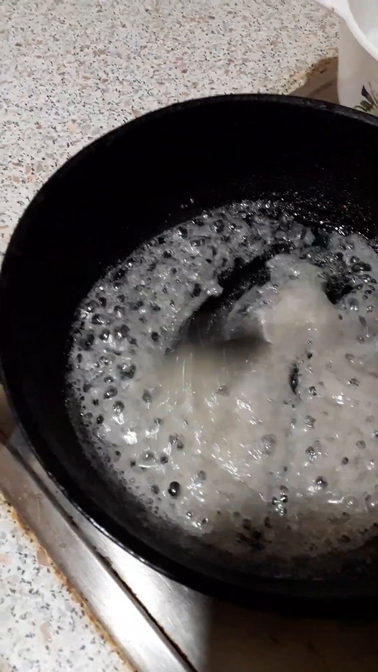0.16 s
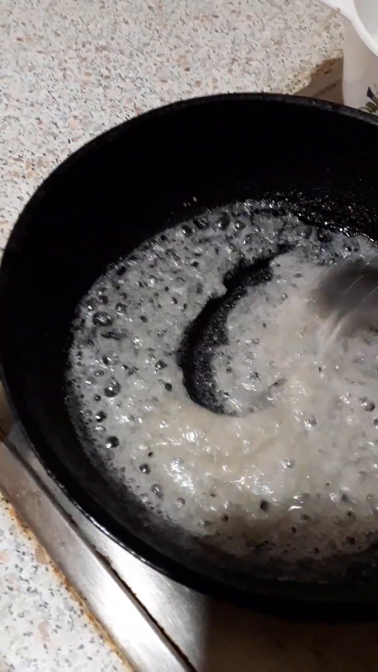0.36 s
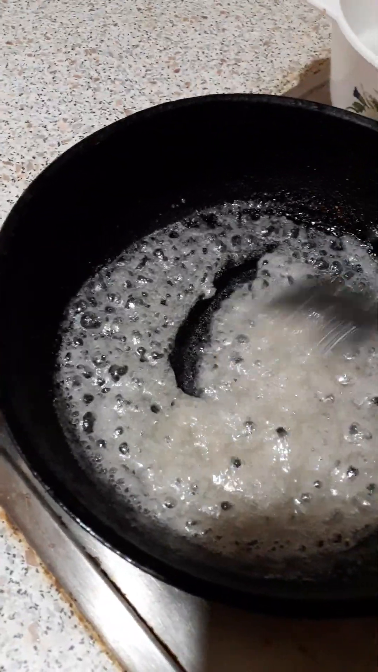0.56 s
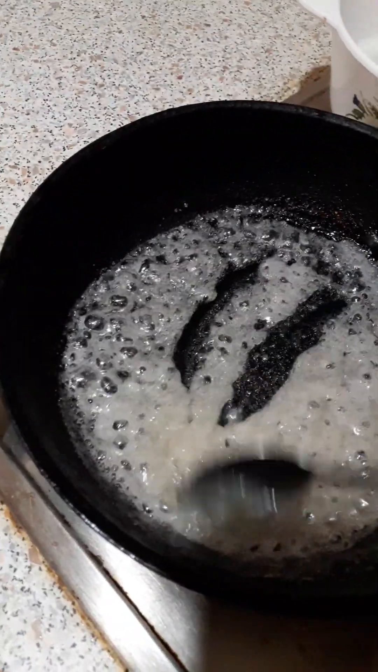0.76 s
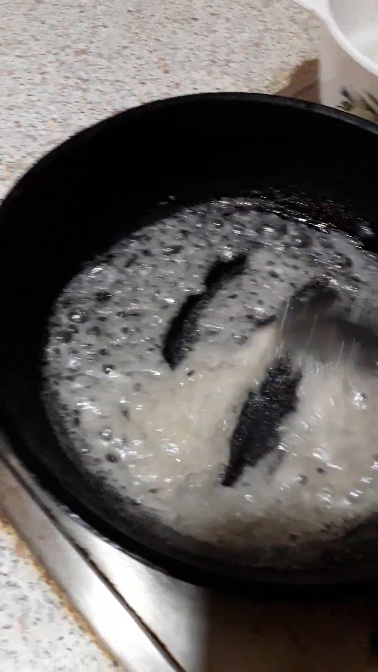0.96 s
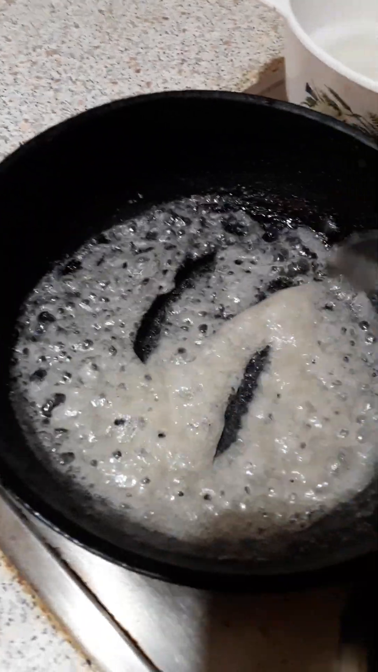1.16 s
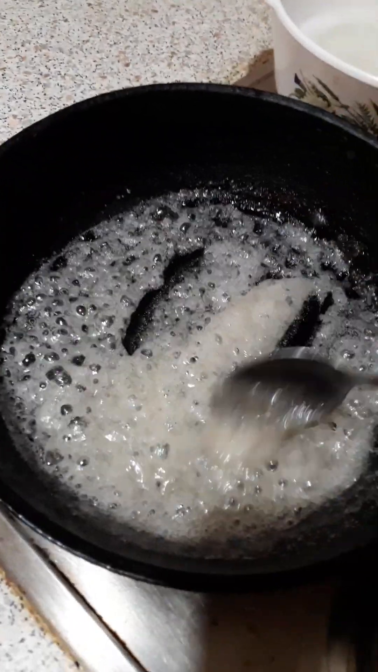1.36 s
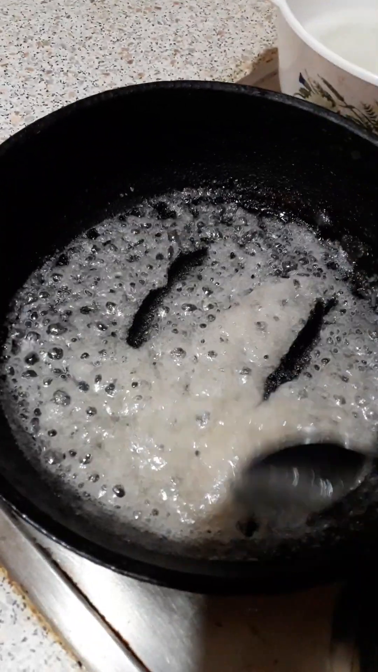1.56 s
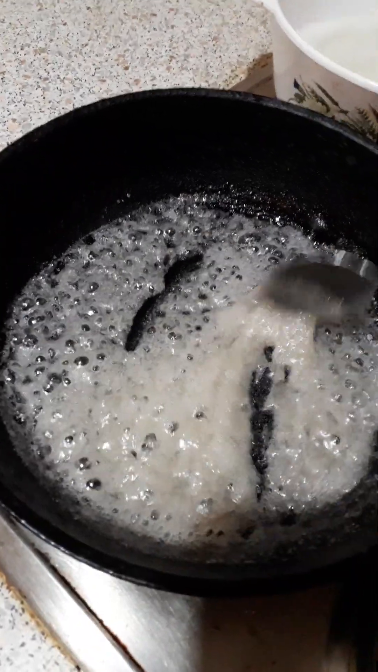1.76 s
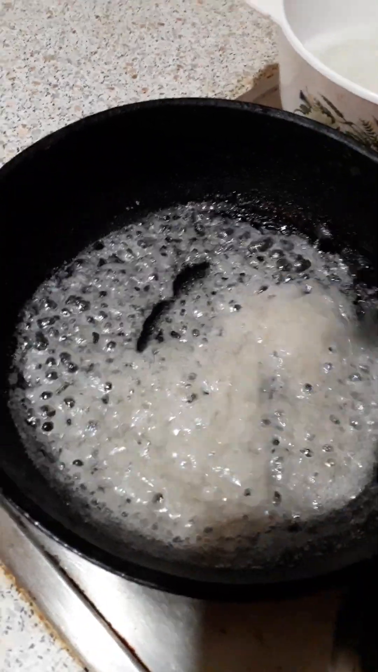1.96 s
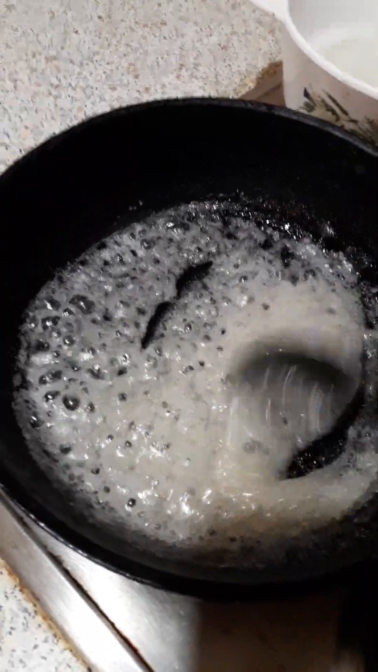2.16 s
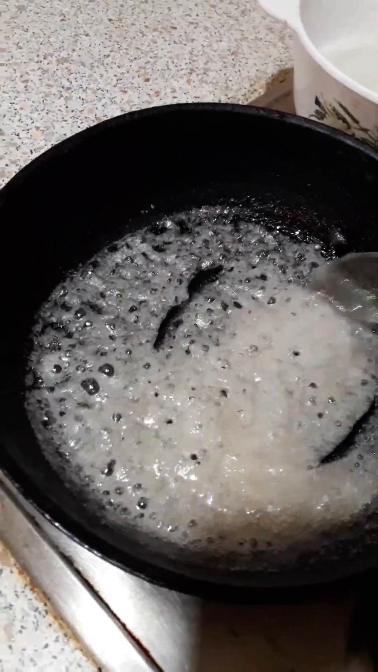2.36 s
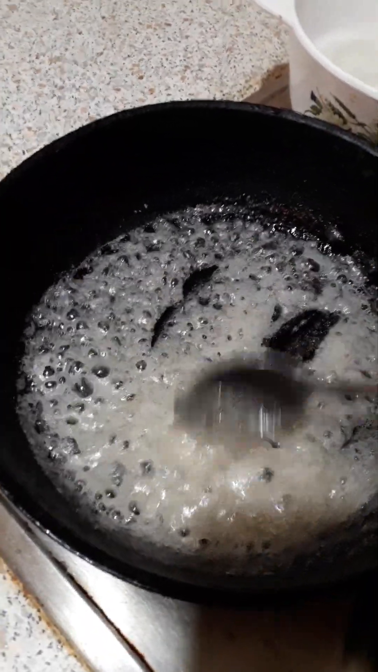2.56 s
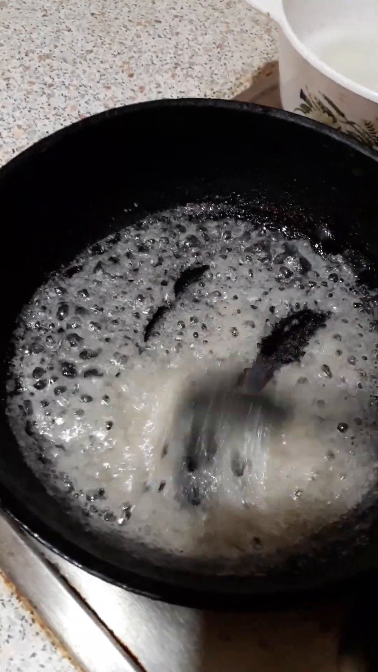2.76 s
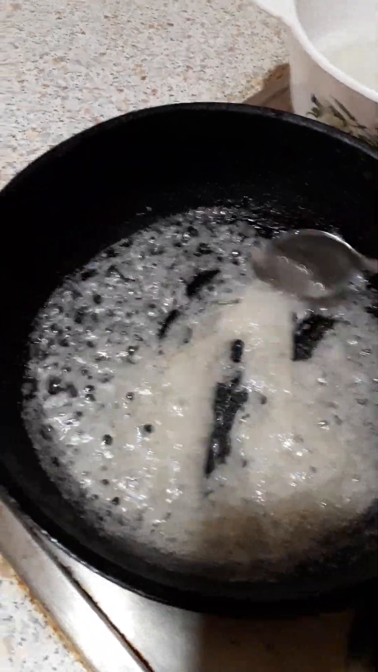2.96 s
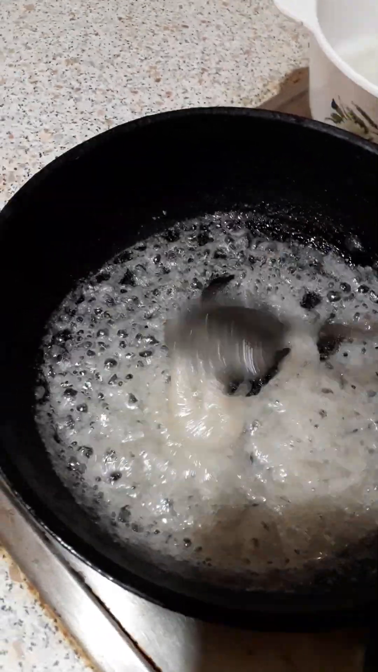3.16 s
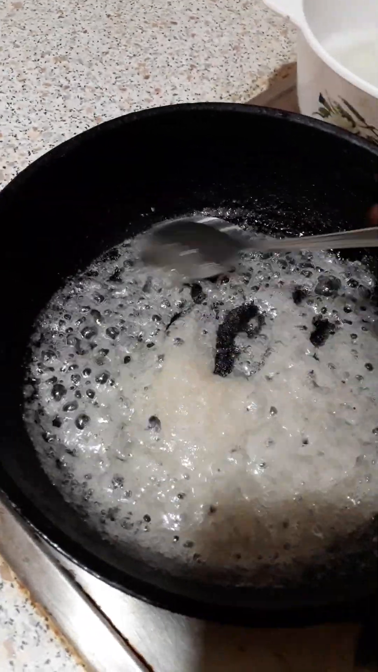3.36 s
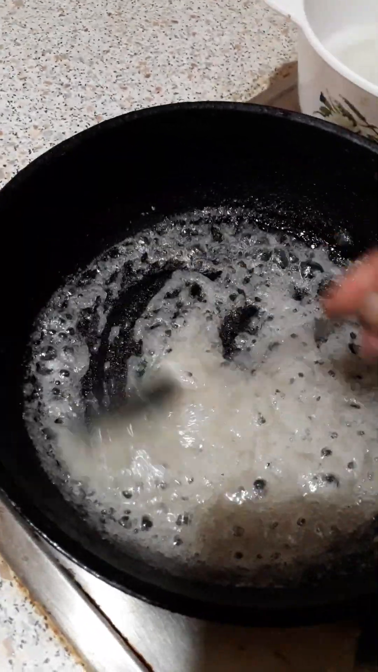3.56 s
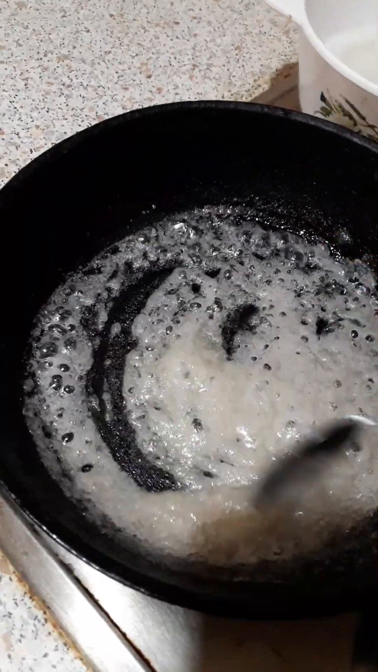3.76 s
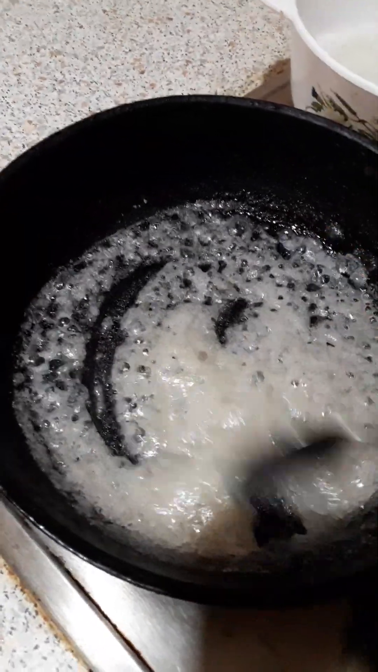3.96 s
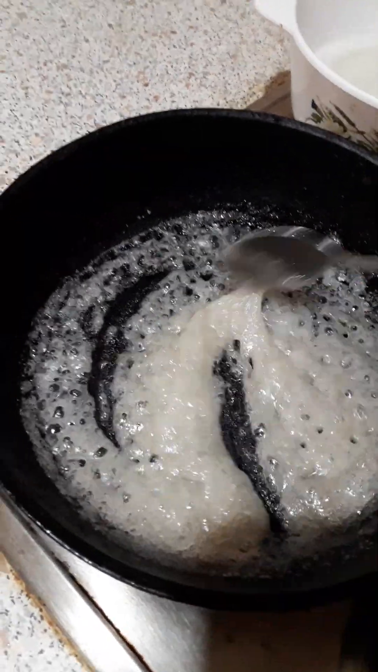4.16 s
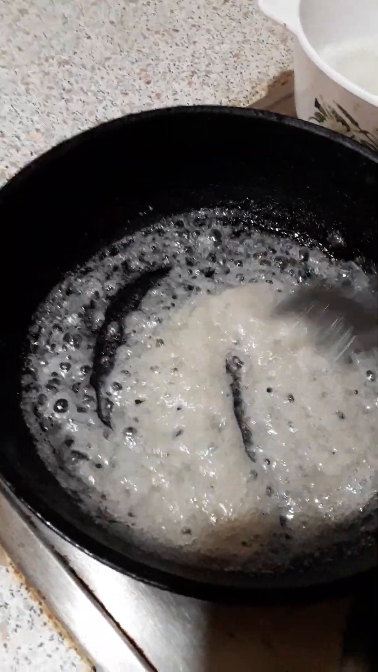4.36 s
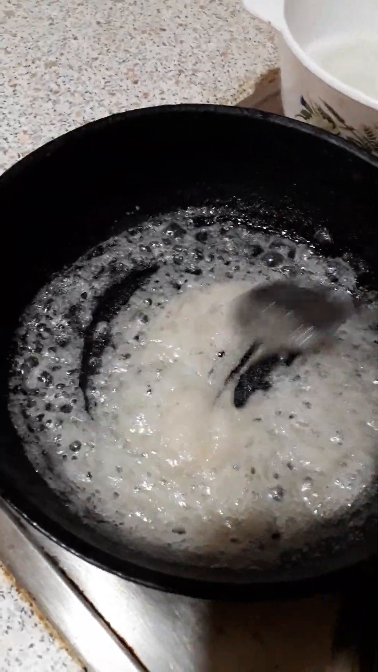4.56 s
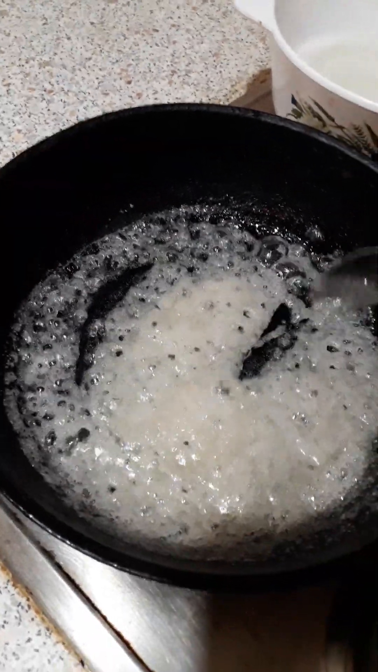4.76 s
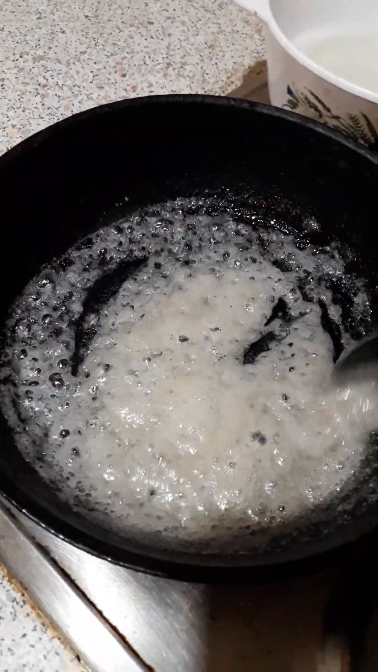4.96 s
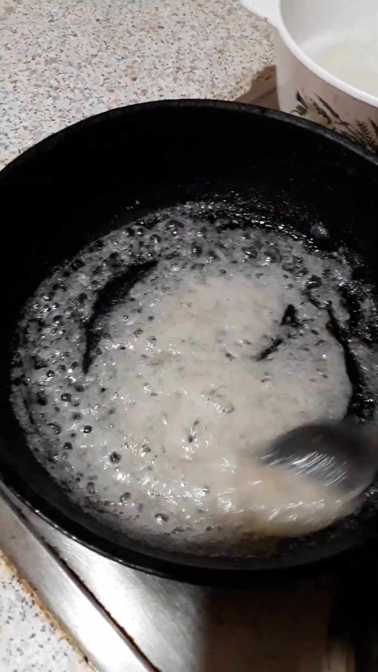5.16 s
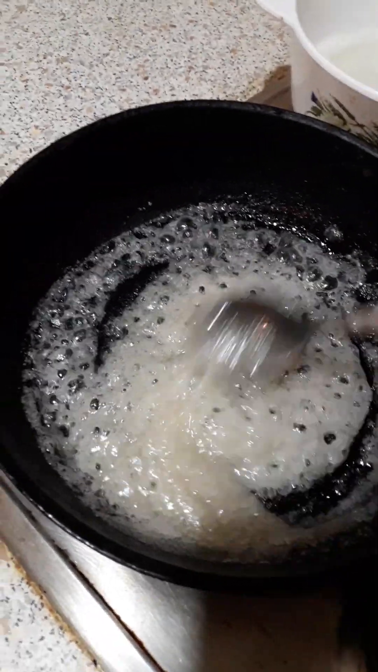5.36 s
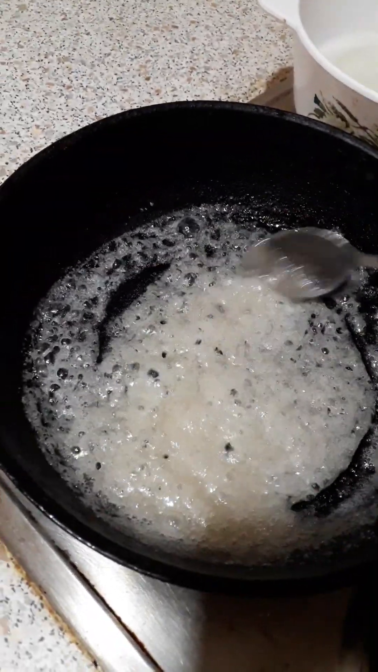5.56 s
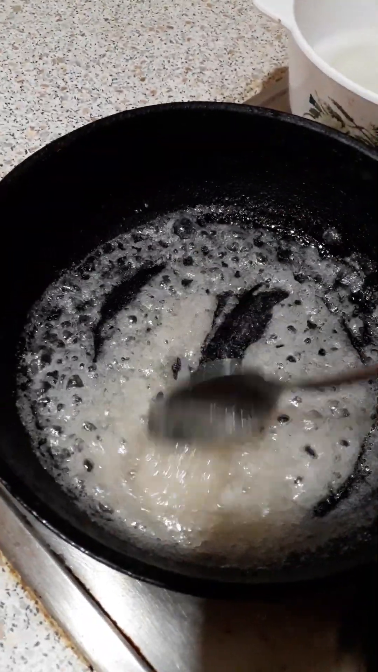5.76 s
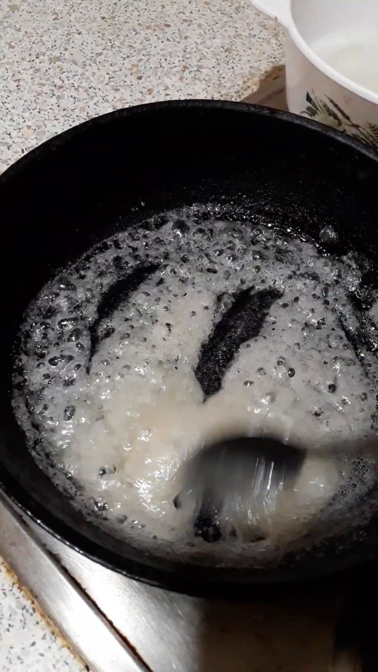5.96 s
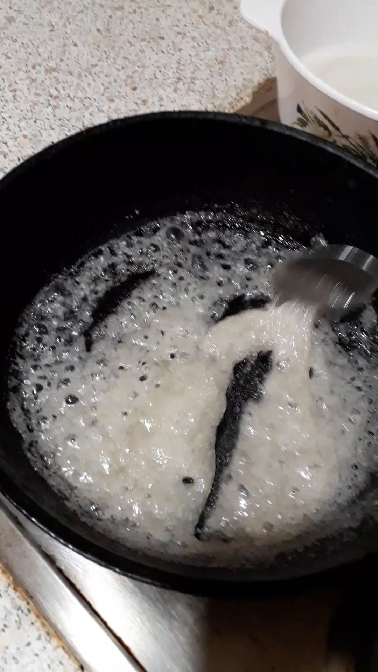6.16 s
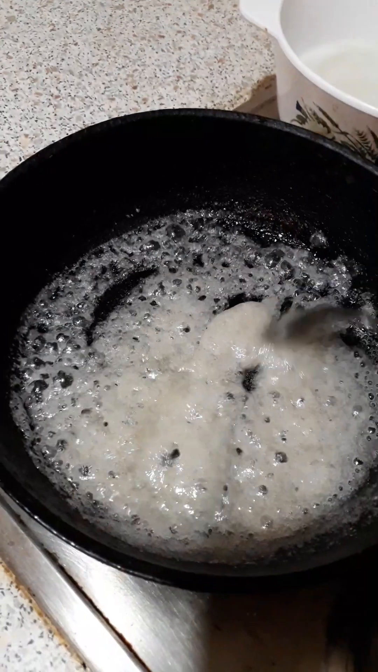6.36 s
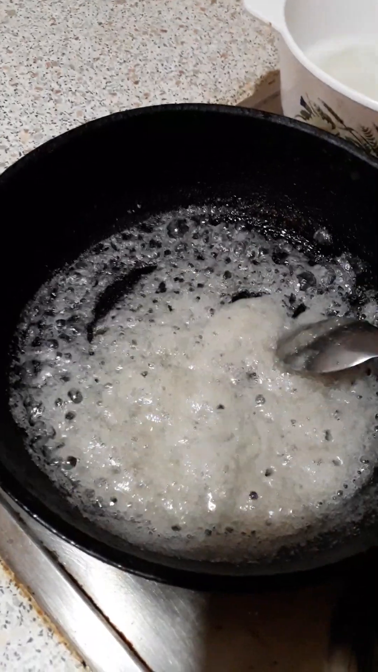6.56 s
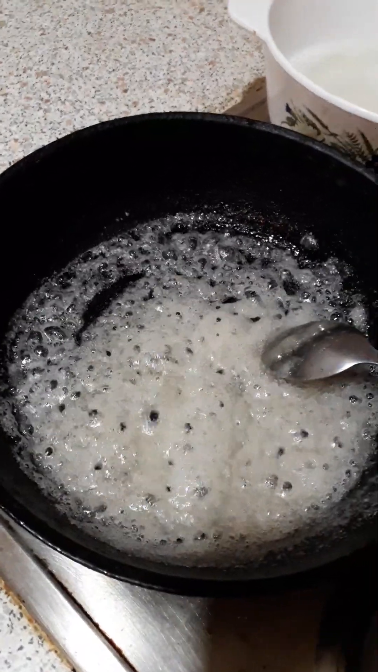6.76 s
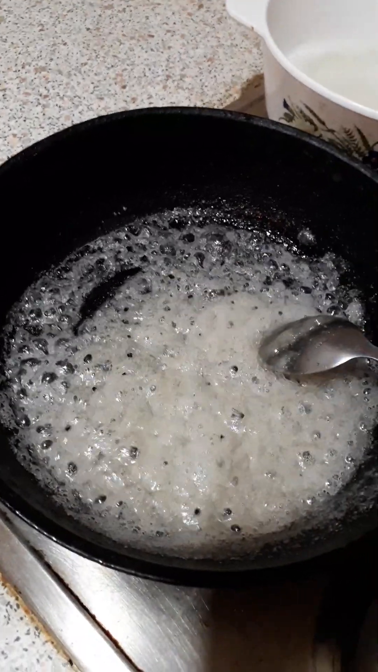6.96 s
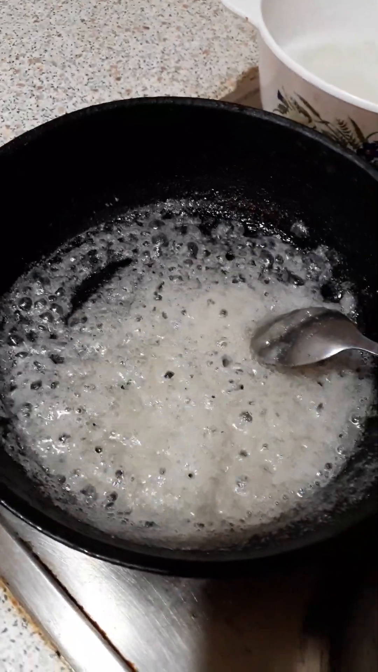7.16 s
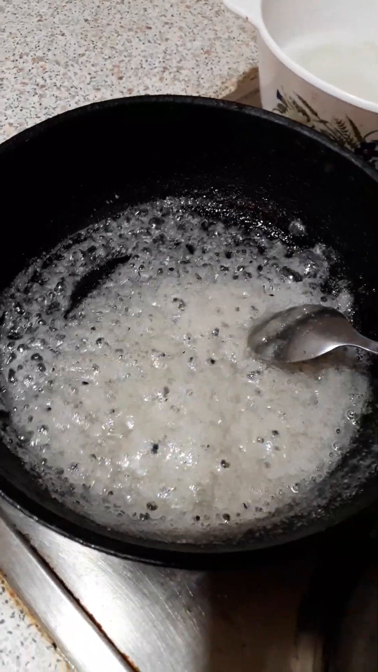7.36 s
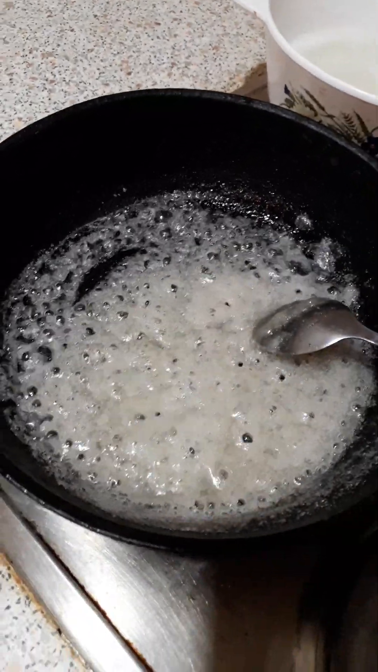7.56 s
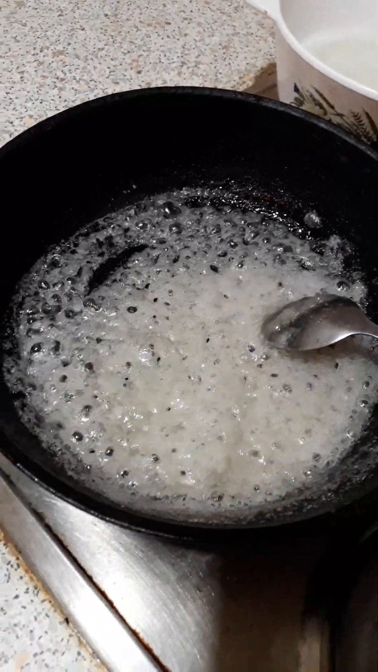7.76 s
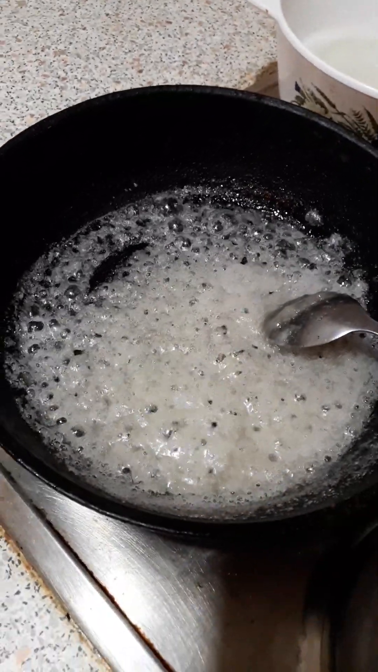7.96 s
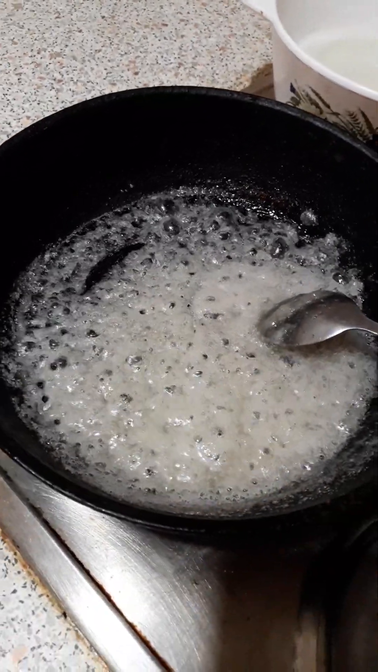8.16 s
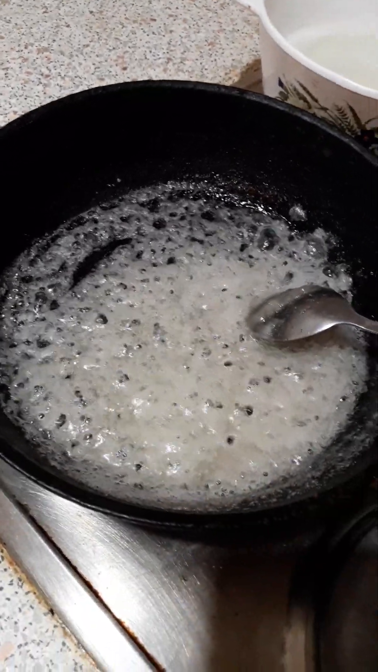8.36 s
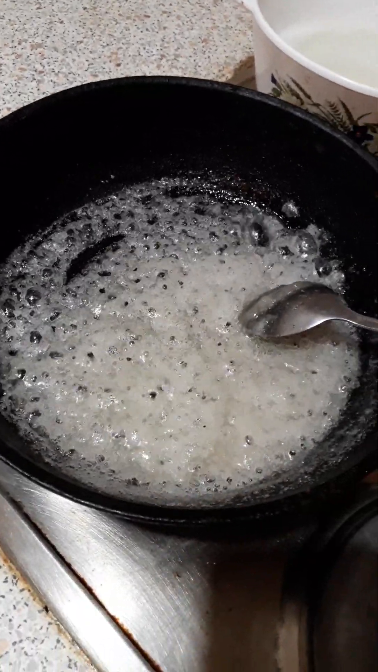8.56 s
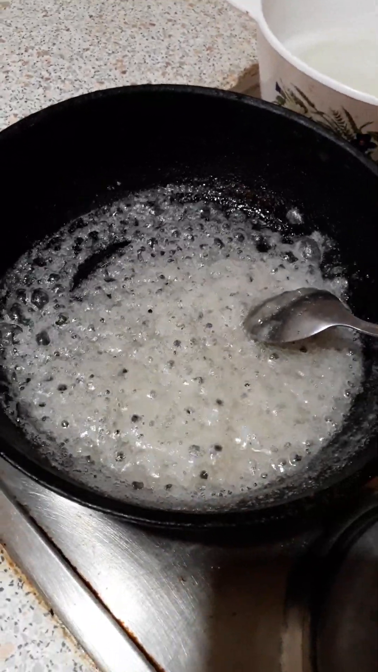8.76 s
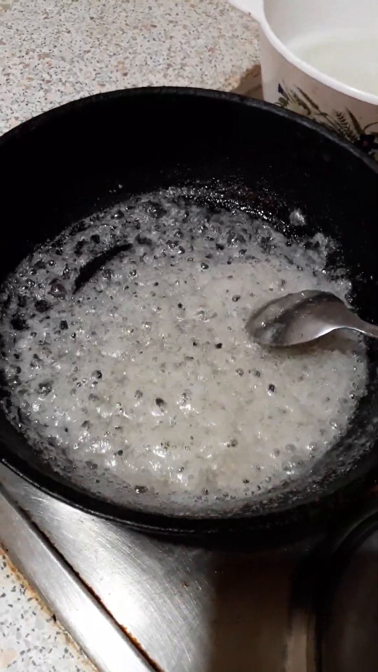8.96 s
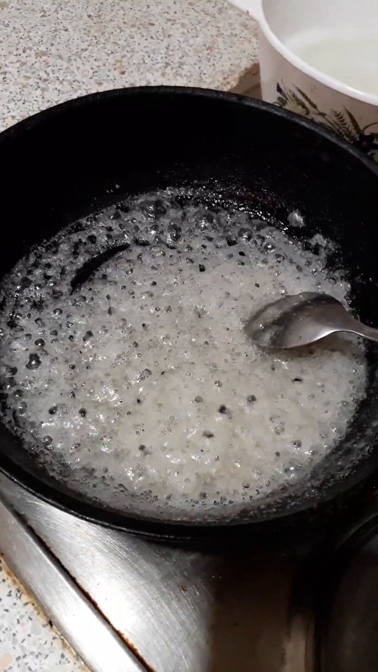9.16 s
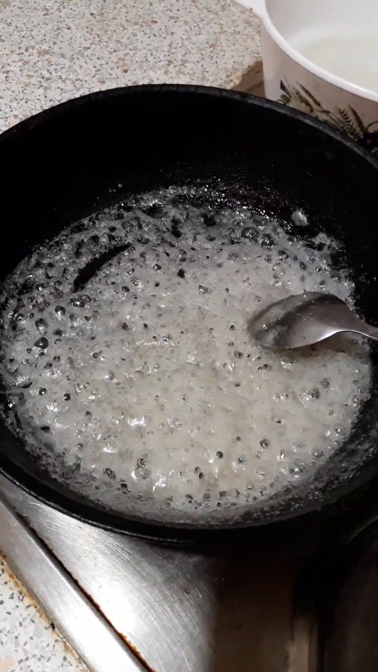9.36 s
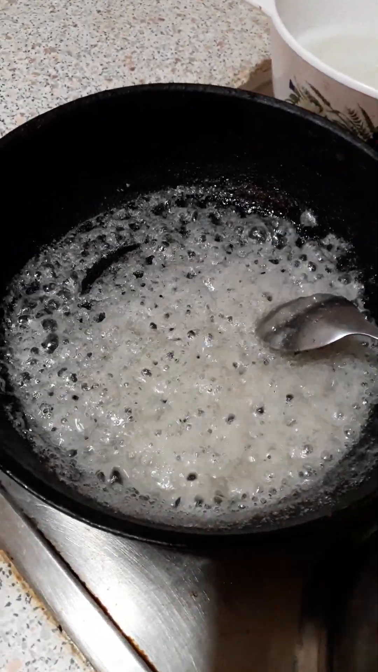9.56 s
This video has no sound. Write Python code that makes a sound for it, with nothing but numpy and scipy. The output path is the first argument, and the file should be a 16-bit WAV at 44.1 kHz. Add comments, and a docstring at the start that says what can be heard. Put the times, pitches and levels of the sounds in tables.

```python
"""A steel spoon stirs boiling sugar in a frying pan on a kitchen stove, close up and alike in both channels.
Most strokes land with a clink, then drag and grate over the pan floor; later the spoon rests, shifting a few times.
Scraping, rasps and squeaks are shaped clicks and noise, judders a wavering hum; clinks ring the metal's modes.
Under it the foam sizzles, a wash of random clicks, and now and then a larger bubble pops with a ringing cavity.
Short kitchen reflections follow the spoon and the pops."""
import sys
import numpy as np
from scipy import signal
from scipy.fft import rfft, irfft, next_fast_len
from scipy.io import wavfile
from scipy.ndimage import uniform_filter1d

SR = 44100
rng = np.random.default_rng(int(sys.argv[2]) if len(sys.argv) > 2 else 0)


def put_to_file(sound):
    """Save the sound as 16-bit audio at rate SR, in the file named by the first command-line argument."""
    columns = np.atleast_2d(sound).T  # one column per channel
    safe = np.clip(columns, -1, 1)
    whole_steps = np.round(safe * 32767)
    wavfile.write(sys.argv[1], SR, whole_steps.astype(np.int16))


N = 424241  # samples
T = np.arange(N) / SR  # s

# Tone of the low drag. Each row: frequency in Hz, relative level per Hz in dB.
DRAG_COLOUR = [(25, -30), (60, -18), (130, -9), (260, -9), (350, -0.5), (480, 0.5), (700, -7.5),
               (1000, -5.5), (1300, -23.5), (2200, -38.5)]
# Modes of the pan. Each row: frequency in Hz, peak over the plain contact in dB before any ring gain, t60 in s.
PAN_RESONANCES = [(223, 10.5, 0.56), (345.4, 6, 0.43), (700, 10.5, 0.13), (787, 2.5, 0.35),
                  (1330, 4, 0.028), (2387, 4.5, 0.017), (3595, 6.5, 0.017), (4700, 3.5, 0.04),
                  (5690, 2, 0.031), (9800, 0, .07), (10550, 13.5, 0.054), (13150, 12, 0.072)]


def amp(db):
    """Decibels to gain."""
    return 10 ** (np.asarray(db) / 20)


def unit(x):
    """Scales to rms 1."""
    return x / np.sqrt(np.mean(x ** 2) + 1e-20)


def at_level(x, db, size=256):
    """Scales a blow so that its loudest few milliseconds have the given level."""
    loudest_power = uniform_filter1d(x ** 2, size).max()
    return x * amp(db) / np.sqrt(loudest_power)


def read(points, hz):
    """Reads a table on a log-frequency axis."""
    f, value = np.transpose(points)
    return np.interp(np.log(hz + 1), np.log(f), value)


def add(mix, s, sound):
    """Mixes a sound in at time s."""
    part = mix[max(round(s * SR), 0):][:len(sound)]
    part += sound[:len(part)]


def band(x, lo_hz, hi_hz, order=3):
    """Band-pass."""
    edges = [lo_hz, min(hi_hz, SR / 2 - 1)]
    return signal.sosfilt(signal.butter(order, edges, "band", fs=SR, output="sos"), x)


def colour(x, points, size=2048):
    """Minimum-phase filter with the given spectrum, so that clicks keep their sharp fronts."""
    log_gain = np.log(amp(read(points, abs(np.fft.fftfreq(size, 1 / SR)))))
    spectrum = np.exp(np.conj(signal.hilbert(log_gain)))
    taps = np.fft.ifft(spectrum).real
    return signal.oaconvolve(x, taps[:size // 2])[:len(x)]


def wander(hz, size=next_fast_len(N)):
    """Slow chance of rms 1, with changes up to about the given rate."""
    spectrum = rfft(rng.standard_normal(size))
    lowpass = 1 / (1 + (np.fft.rfftfreq(size, 1 / SR) / hz) ** 4)
    return unit(irfft(spectrum * lowpass, size)[:N])


def swell(s, length):
    """A bell-shaped rise and fall around time s, 17 dB down at one length to either side."""
    return np.exp(-2 * np.minimum(((T - s) / length) ** 2, 20))


def grains(per_s, spread_db):
    """Random clicks of either sign, their sizes in dB scattered exponentially."""
    sizes = amp(spread_db * np.minimum(rng.exponential(1, N), 5))
    signs = rng.choice([-1, 1], N)
    struck = rng.random(N) < per_s / SR
    return unit(sizes * signs * struck)


def ringing(modes):
    """The decaying tones that one blow leaves in a resonant body."""
    t = T[:SR // 4]
    hz, db, t60 = np.transpose(modes)[:, :, None]
    decay = np.log(1000) / t60
    peak = amp(db) * 2 * decay / SR  # slow decays start softer, so that dB is the resonance peak
    return (peak * np.exp(-decay * t) * np.cos(2 * np.pi * hz * t)).sum(0)


def blow(decay_s):
    """A contact of energy 1: a sharp front, then brief chatter."""
    t = T[:SR // 4]
    contact = rng.standard_normal(len(t)) * np.exp(-t / decay_s)
    return contact / np.linalg.norm(contact)


def pan(x, ring_db):
    """The plain contact plus the ringing of the pan."""
    return x + amp(ring_db) * signal.oaconvolve(x, ringing(PAN_RESONANCES))[:len(x)]


def travel(x, depth_db, size=512):
    """As the point of contact moves, each part of the pan's spectrum swells and fades on its own."""
    z = signal.stft(x, nperseg=size)[2]
    patches = uniform_filter1d(rng.standard_normal(z.shape), 3, axis=0)  # across frequency
    patches = unit(uniform_filter1d(patches, 8, axis=1))  # across time
    return signal.istft(z * amp(depth_db * patches), nperseg=size)[1][:N]


def kitchen(x, wet_db, rise_s=0.003, size=256):
    """Adds the reflections of worktop and walls, each band dying at its own speed."""
    # Each row: frequency in Hz, t60 in s.
    room_decay = [(200, 0.34), (1500, 0.27), (12000, 0.1)]
    taps = rng.standard_normal(SR // 2) * (1 - np.exp(-T[:SR // 2] / rise_s))
    hz, t, z = signal.stft(taps, SR, nperseg=size)
    fade_db = -60 * t / read(room_decay, hz)[:, None]
    tail = signal.istft(z * amp(fade_db), SR, nperseg=size)[1]
    return x + amp(wet_db) * signal.oaconvolve(x, tail / np.linalg.norm(tail))[:N]


def sizzle(level_db=-51.5, flicker_db=0.5, swell_db=-0.35, crackle_db=-7.5, hollow_db=-7):
    """Countless tiny bubbles burst in the foam; nearer ones crackle, each in its own register."""
    # Tone of the foam. Each row: frequency in Hz, relative level per Hz in dB.
    foam_colour = [(25, -23), (55, -16.5), (120, -5), (200, -25), (400, -15.5), (1000, -15), (1330, -9),
                   (1550, -10.5), (1750, -4.5), (2450, -2.5), (3300, -4.5), (3900, -9.5), (4800, -7),
                   (7500, -16), (10500, -15.5), (12500, -11), (16000, -10.5)]
    wash = grains(per_s=14000, spread_db=-0.5) * amp(flicker_db * wander(hz=44.7))
    crackle = 0
    edges = np.geomspace(1000, 16000, 7)  # six registers, Hz
    for lo, hi in zip(edges, edges[1:]):
        crackle = crackle + band(grains(per_s=300, spread_db=5.0), lo, hi, order=2)
    bursts = wash + amp(crackle_db) * crackle
    hollow = ringing([(2470, hollow_db, 0.0074)])  # the hollow of the pan sings along
    bursts = bursts + signal.oaconvolve(bursts, hollow)[:N]
    return amp(level_db) * unit(colour(bursts, foam_colour) * amp(swell_db * wander(hz=12)))


def pops(echo=0.11, echo_s=0.0042, level_db=-5.0, cavity_hz=1750, cavity_db=-5, cavity_t60=0.015, small_db=-69):
    """A bubble snaps, its cavity rings for a moment, and the pan's walls throw the snap about."""
    # Large bubbles bursting. Each row: start in s, level in dB before the common trim level_db.
    large_bubbles = [(1.002, -19), (1.8955, -28.5), (3.7485, -34), (6.4328, -28), (6.491, -28.5),
                     (8.074, -41)]
    # Tone of a burst. Each row: frequency in Hz, relative level per Hz in dB.
    pop_colour = [(200, -51), (800, -25), (1250, -6.5), (1750, 3), (3100, -12), (4000, -34), (9000, -51)]
    out, t = np.zeros(N), T[:SR // 4]
    snap = (t == 0) + ringing([(cavity_hz, cavity_db, cavity_t60)])
    for s, db in large_bubbles:
        scatter = echo * rng.standard_normal(len(t)) * np.exp(-t / echo_s)
        add(out, s, at_level(colour(snap + scatter, pop_colour), db + level_db))
    small = signal.oaconvolve(grains(per_s=44, spread_db=0.4), snap)[:N]  # middling bubbles burst at random
    return out + amp(small_db) * unit(colour(small, pop_colour))


def bumps(push_s=0.026, cushion_hz=650):
    """The spoon bumps softly through the syrup: cushioned pushes that stir mainly the pan's low modes."""
    # Each row: start in s, level in dB.
    soft_pushes = [(3.636, -41.5), (3.892, -38.5), (4.066, -49.5), (6.606, -43.5), (8.212, -49),
                   (8.467, -44), (8.561, -51), (9.336, -57), (9.471, -54.5)]
    out = np.zeros(N)
    for s, db in soft_pushes:
        push = band(blow(push_s), 60, cushion_hz, order=1)
        add(out, s, at_level(colour(pan(push, ring_db=0), DRAG_COLOUR), db))
    return out


def judders(pan_hz=348, waver=0.0548, uneven_db=2.0, trim_db=-5):
    """The spoon's slipping locks unevenly on to a low mode of the pan floor, a wavering hum near 348 Hz."""
    # Each row: middle in s, level in dB before the trim, length of the swell in s.
    hums = [(2.053, -27.5, 0.012), (2.081, -30, 0.028), (2.772, -36.5, 0.019), (3.917, -38.5, 0.027),
            (4.006, -36.5, 0.029), (4.908, -40, 0.073), (5.076, -41.5, 0.12), (5.194, -33.5, 0.053),
            (6.019, -40, 0.043), (6.474, -51, .03), (9.031, -59.5, 0.057), (9.168, -59, 0.034)]
    wavering_hz = pan_hz * (1 + waver * wander(hz=70.5))
    hum = np.sin(2 * np.pi * np.cumsum(wavering_hz) / SR)
    hum = unit(hum * amp(uneven_db * wander(hz=70)))
    return hum * sum(amp(db + trim_db) * swell(s, length) for s, db, length in hums)


def squeak(width=1.14, overtone=1.37, overtone_db=-7):
    """The edge bites dry metal: very fast stick and slip, caught in two resonances of the spoon's bowl."""
    # Each row: middle in s, level of the lower resonance in dB, its centre in Hz, length of the swell in s.
    bites = [(2.01, -43, 8100, 0.038), (4.022, -51, 7800, .05), (4.965, -48, 7700, 0.12),
             (5.112, -44, 8350, 0.039), (6.046, -56, 8000, 0.062)]
    slips = travel(rng.standard_normal(N), depth_db=4) * amp(2 * wander(hz=80))
    out = 0
    for s, db, hz, length in bites:
        low, high = (unit(band(slips, f / width, f * width, order=2)) for f in (hz, hz * overtone))
        out = out + amp(db) * swell(s, length) * (low + amp(overtone_db) * high)
    return out


def rasps(width=1.17):
    """The spoon's edge catches and rasps in short runs of fast stick and slip."""
    # Each row: middle in s, level in dB, centre in Hz, length of the swell in s.
    catches = [(0.022, -38.5, 2350, .007), (0.082, -42, 2230, .01), (0.395, -42, 2210, 0.0095),
               (0.59, -41.5, 1330, 0.025), (3.075, -41, 1330, 0.022), (4.41, -44.5, 1410, 0.039),
               (5.643, -34, 1390, 0.021)]
    slips = pan(grains(per_s=1200, spread_db=2), ring_db=-8)
    out = 0
    for s, db, hz, length in catches:
        rasp = unit(band(slips, hz / width, hz * width, order=2))
        out = out + amp(db) * swell(s, length) * rasp
    return out


def clinks(chatter_s=0.0079, knock_s=0.015, ring_db=-1.0, knock_db=-2.0, sparkle_db=-3.5,
           spoon_db=-5.0, pan_db=1.0, hard_db=-26, detune=0.027):
    """Light touches ring mostly the spoon; hard blows cut through the syrup and ring the pan."""
    # The spoon meets the pan. Each row: start in s, bright ring in dB and dull knock in dB, both before trims.
    contacts = [(0.02, -43.5, -64), (0.162, -20.5, -30), (0.361, -33.5, -43), (0.52, -41.5, -39),
                (0.587, -46, -34.5), (1.218, -32.5, -45), (1.309, -41, -44), (1.551, -43, -55),
                (1.904, -41.5, -41), (2.039, -42, -31.5), (2.078, -32, -37), (2.382, -42, -45),
                (3.03, -46.5, -45), (3.297, -30.5, -46), (3.89, -44, -42), (4.305, -38.5, -35),
                (4.767, -30, -40.5), (4.845, -52, -35), (5.242, -20.5, -27), (5.57, -42, -48.5),
                (5.934, -44, -40), (6.281, -40, -32.5), (6.298, -36, -57), (6.604, -61, -45),
                (7.191, -47, -64), (7.319, -34.5, -47.5), (8.207, -41, -49), (8.438, -30.5, -31),
                (8.628, -33, -45.5), (9.361, -47, -44)]
    # Tone of a contact. Each row: frequency in Hz, relative level per Hz in dB.
    clink_colour = [(40, -5), (150, -13.5), (400, 1), (700, 2.5), (1080, 0), (1500, 4), (2300, 6),
                    (2900, -2.5), (4800, 5.5), (7000, 1), (8500, -4.5), (11000, -5), (16000, -9.5)]
    # Modes of the spoon. Each row: frequency in Hz before detuning, peak in dB before spoon_db, t60 in s.
    spoon_modes = np.array([(4614, 19.5, 0.072), (5670, 7, 0.043), (6275, 16, 0.037), (7250, -21, .03),
                            (10800, -15, 0.025), (11900, 15, 0.017)])
    out = np.zeros(N)
    for s, db, knock in contacts:
        hard = min(amp(db + ring_db - hard_db), 1)  # 1 from hard_db upwards
        load = 1 + detune * rng.uniform(-0.97, 1)  # clinging syrup shifts the spoon's modes
        spoon = ringing(spoon_modes * [load, 1, 1])
        metal = hard * amp(pan_db) * ringing(PAN_RESONANCES) + (1 - hard) * amp(spoon_db) * spoon
        bright = colour(blow(chatter_s) + metal, clink_colour)
        dull = colour(pan(blow(knock_s), ring_db=-9), clink_colour)
        add(out, s, at_level(band(dull, 70, 2700), knock + knock_db))
        add(out, s, at_level(band(bright, 2900, 9000), db + ring_db))
        add(out, s, at_level(band(bright, 9000, 17500), db + sparkle_db))  # the top octave
    return out


def pressure(start, rise, hold, touch_db, ease_db_per_s, wake_db, wake_db_per_s):
    """Gain over one stroke: light touch-down, swell, hold and release, then the slow wake in the syrup."""
    t = T - start
    after = np.maximum(t - rise - hold, 0)
    pressing_db = -touch_db * np.clip(1 - t / rise, 0, 1) - ease_db_per_s * after
    wake_level_db = -wake_db - wake_db_per_s * after
    return (t >= 0) * amp(np.maximum(pressing_db, wake_level_db))


def stirring(rest_drag_db=-73.5, rest_grit_db=-63.5):
    """Gains of low drag and high grit, summed in power over all strokes and the faint undisturbed boil."""
    # Strokes over the pan floor. Each row: touch-down in s, rise in s, hold in s,
    # low drag in dB and high grit in dB, both before the trims of the scraping.
    strokes = [(0.007, 0.18, .025, -41, -42), (0.524, .07, 0.013, -41.5, -44.5),
               (0.835, 0.067, 0.031, -39.5, -43.5), (1.212, 0.027, 0.063, -46, -48),
               (1.548, 0.066, 0.021, -40.5, -44), (1.905, 0.07, 0.13, -42.5, -49.5),
               (2.381, 0.059, 0.022, -46, -45), (2.704, 0.062, 0.048, -41.5, -47),
               (3.031, 0.031, 0.02, -45, -45.5), (3.354, .13, 0.17, -44, -46),
               (3.905, 0.095, 0.04, -39, -44), (4.294, 0.026, 0.12, -48, -48.5),
               (4.761, 0.053, 0.44, -42.5, -50.5), (5.567, 0.087, 0.015, -39, -43),
               (5.921, 0.082, 0.02, -39.5, -42), (6.274, 0.0055, 0.044, -36, -52),
               (6.408, 0.057, 0.018, -44.5, -51.5)]
    # The syrup flows back into the furrow: the wake churns in the drag and fizzes in the grit.
    drag_shape = dict(touch_db=18, ease_db_per_s=252, wake_db=29, wake_db_per_s=50)
    grit_shape = dict(touch_db=12, ease_db_per_s=193, wake_db=22.5, wake_db_per_s=2)
    drag_power, grit_power = amp(rest_drag_db) ** 2, amp(rest_grit_db) ** 2
    for s, rise, hold, drag_db, grit_db in strokes:
        drag_power = drag_power + (amp(drag_db) * pressure(s, rise, hold, **drag_shape)) ** 2
        grit_power = grit_power + (amp(grit_db) * pressure(s, rise, hold, **grit_shape)) ** 2
    return np.sqrt(drag_power), np.sqrt(grit_power)


def scraping(drag_db=-4.5, grit_db=-1.5, lumps_db=3.5, chatter_db=2.5):
    """The spoon slips in small jerks that shake the pan, and grinds over sugar crystals."""
    # Tone of the high grit. Each row: frequency in Hz, relative level per Hz in dB.
    grit_colour = [(500, -18), (1080, -5), (1300, 6.5), (1560, 0), (2100, 7), (2500, 7), (3000, 3.5),
                   (4200, -1.5), (6800, -3.5), (7900, -1), (9700, -11.5), (11300, -6.5), (13000, -5.5),
                   (16000, -6.5)]
    drag, grit = stirring()
    slips = grains(per_s=700, spread_db=2.0) * amp(lumps_db * wander(hz=48))
    slips = unit(colour(pan(slips, ring_db=0.0), DRAG_COLOUR))
    crystals = grains(per_s=2000, spread_db=2.5) * amp(chatter_db * wander(hz=128))
    crystals = colour(pan(travel(crystals, depth_db=3), ring_db=-4), grit_colour)
    crystals = crystals / np.std(band(crystals, 3000, 12000))  # rms 1 within this band
    return slips * drag * amp(drag_db) + crystals * grit * amp(grit_db)


def scene():
    """Spoon and foam in the kitchen, the same in both channels."""
    rubbing = kitchen(scraping() + rasps() + squeak() + judders() + bumps(), wet_db=-10.5)
    struck = kitchen(clinks(), wet_db=-11.5)
    bubbles = kitchen(pops(), wet_db=-19) + sizzle()
    mix = rubbing + struck + bubbles
    return np.array([mix, mix])


def record(dry, edge_hz=15750):
    """The recorder's band limit: a steep low-pass."""
    lowpass = signal.firwin(701, edge_hz, window=("kaiser", 8), fs=SR)
    return signal.oaconvolve(dry, lowpass[None], "same")


dry = scene()
out = record(dry)
put_to_file(out)
```